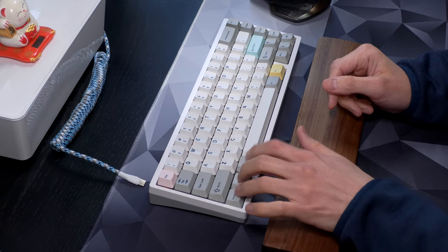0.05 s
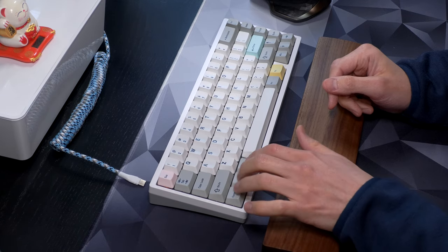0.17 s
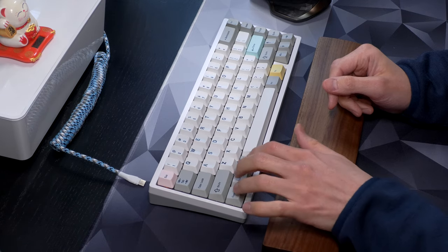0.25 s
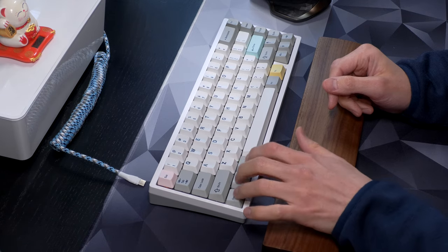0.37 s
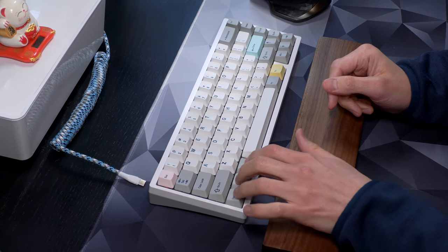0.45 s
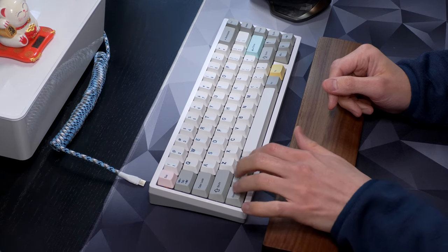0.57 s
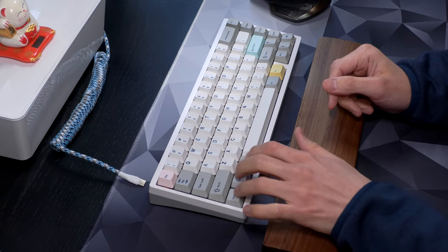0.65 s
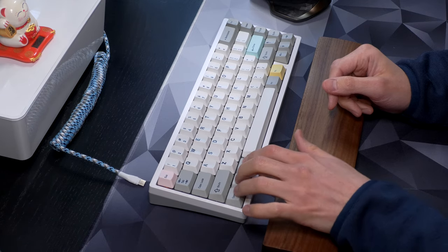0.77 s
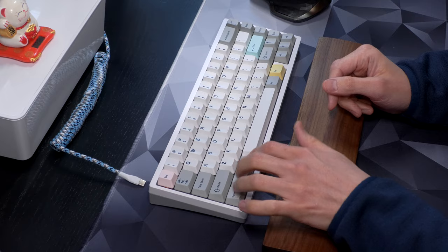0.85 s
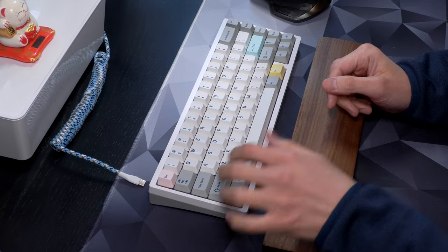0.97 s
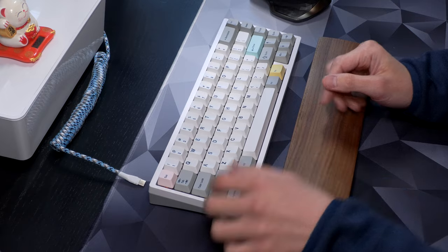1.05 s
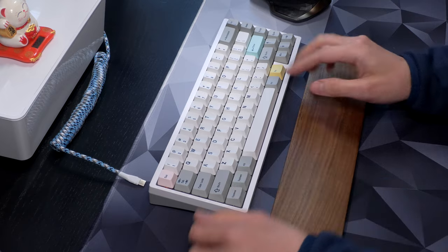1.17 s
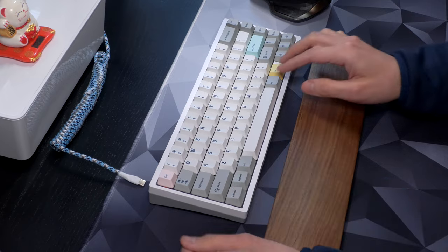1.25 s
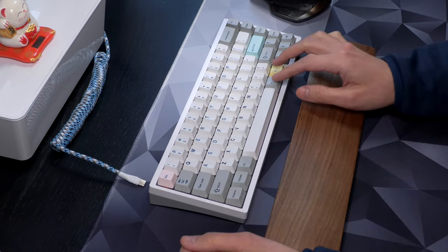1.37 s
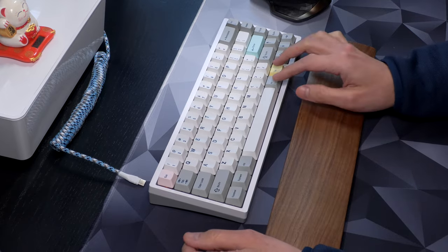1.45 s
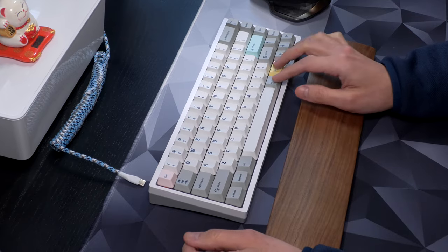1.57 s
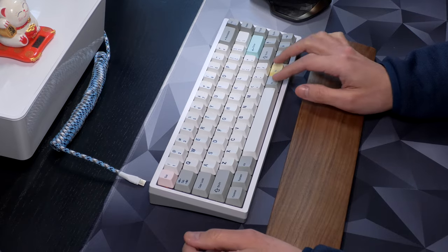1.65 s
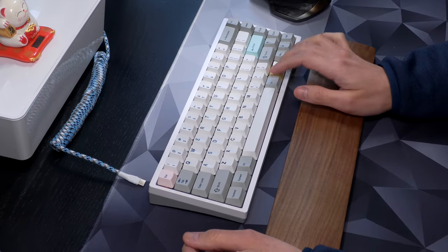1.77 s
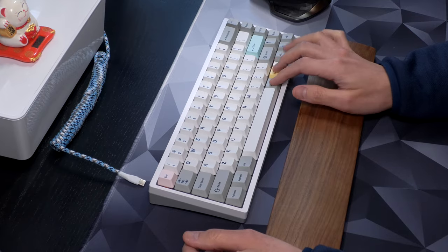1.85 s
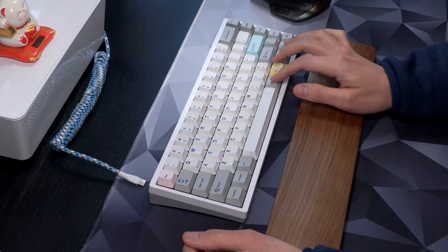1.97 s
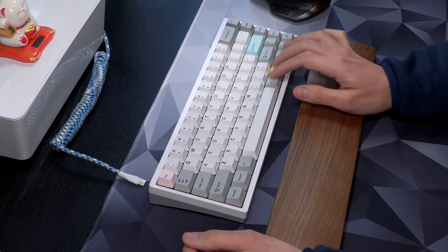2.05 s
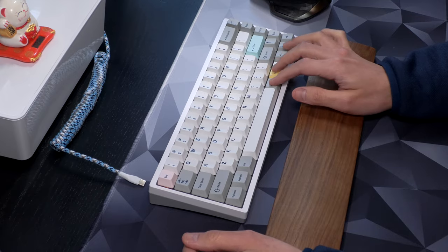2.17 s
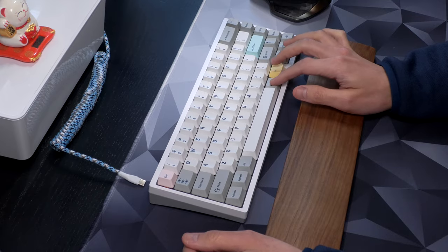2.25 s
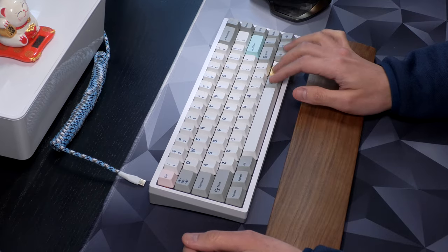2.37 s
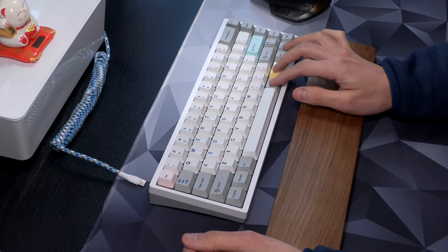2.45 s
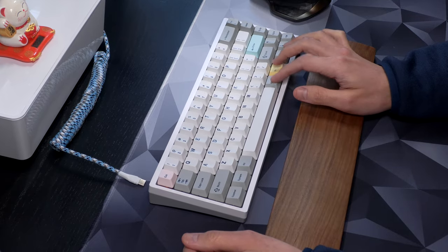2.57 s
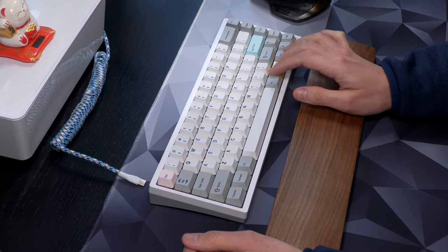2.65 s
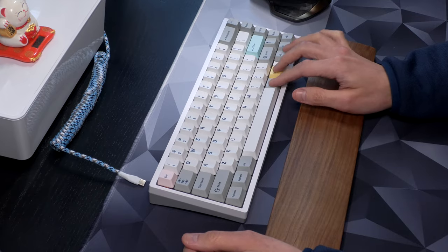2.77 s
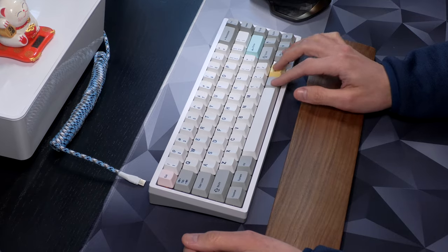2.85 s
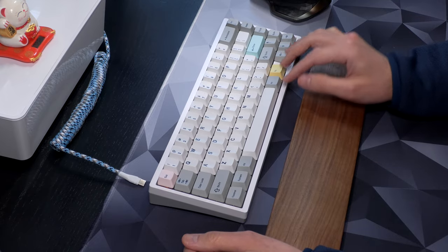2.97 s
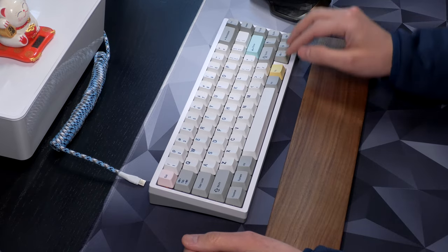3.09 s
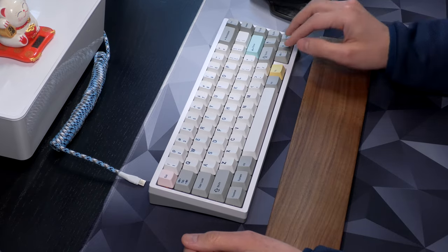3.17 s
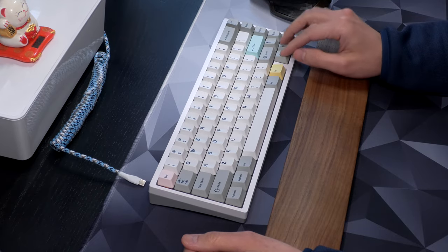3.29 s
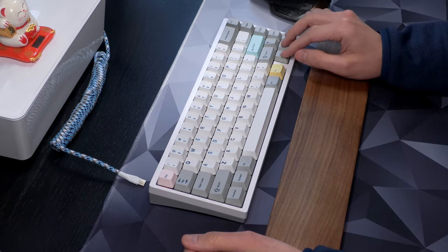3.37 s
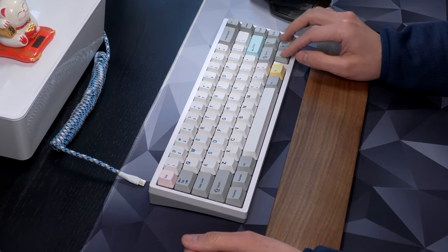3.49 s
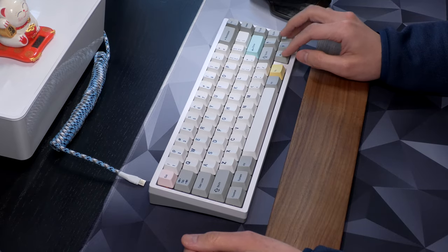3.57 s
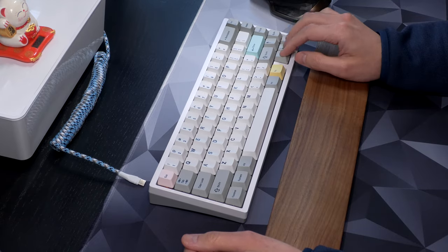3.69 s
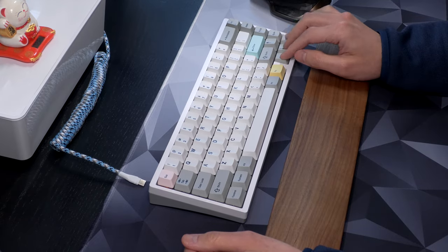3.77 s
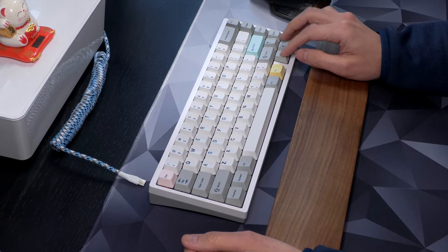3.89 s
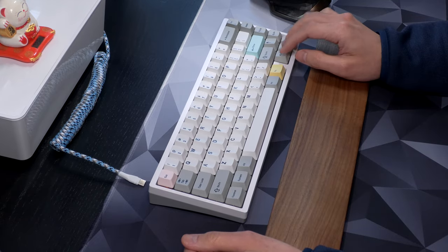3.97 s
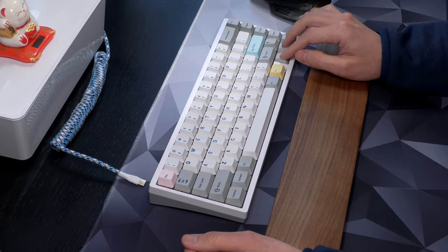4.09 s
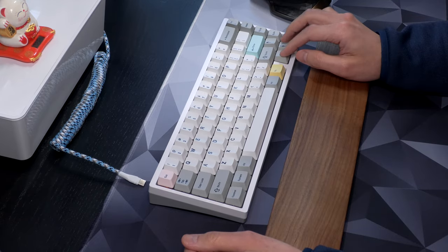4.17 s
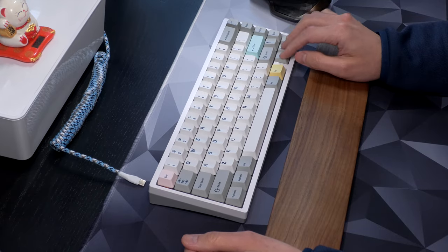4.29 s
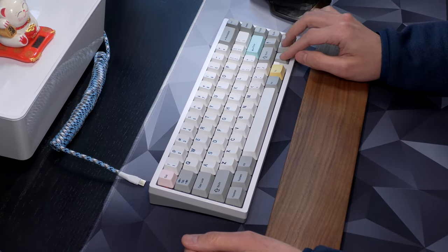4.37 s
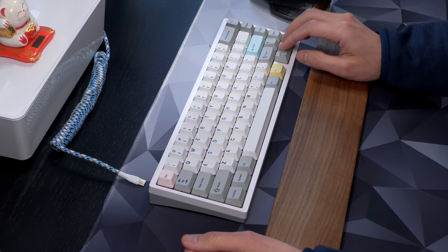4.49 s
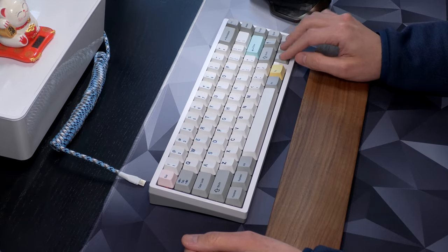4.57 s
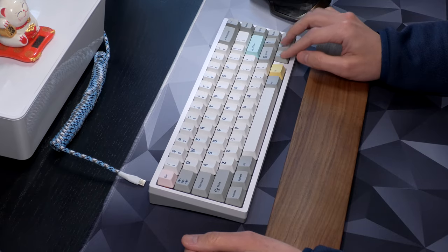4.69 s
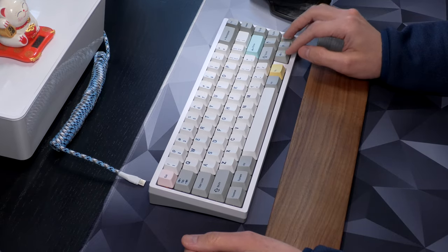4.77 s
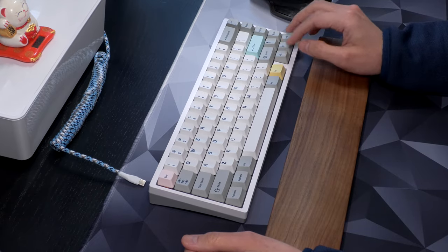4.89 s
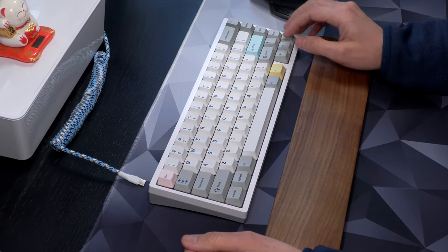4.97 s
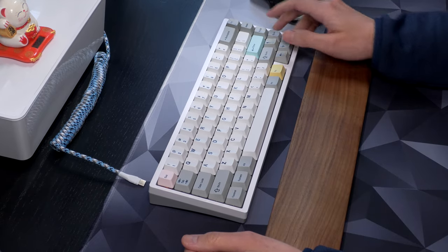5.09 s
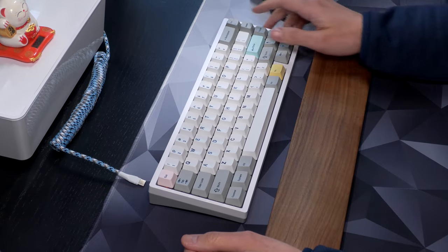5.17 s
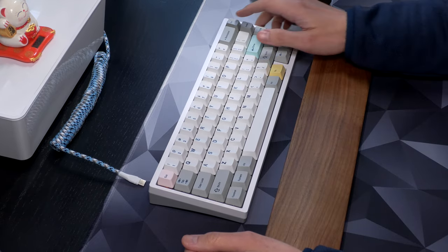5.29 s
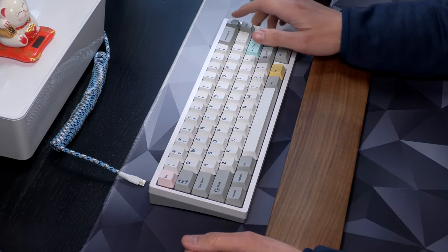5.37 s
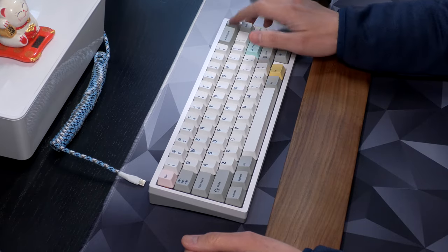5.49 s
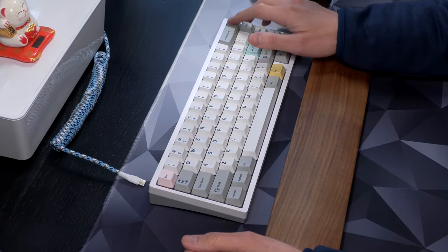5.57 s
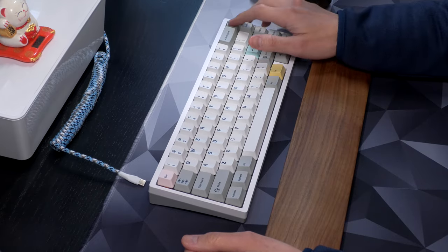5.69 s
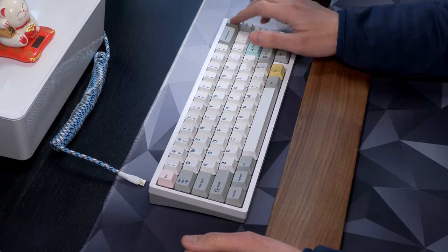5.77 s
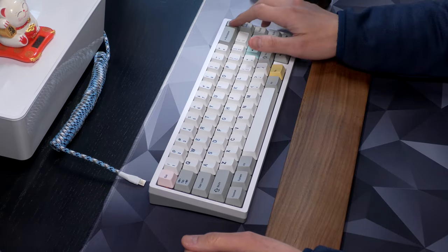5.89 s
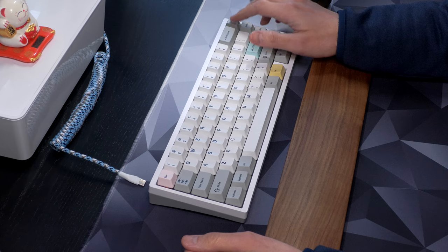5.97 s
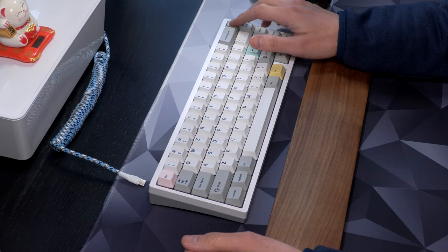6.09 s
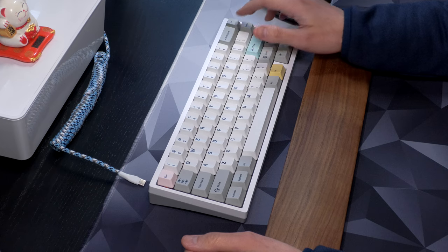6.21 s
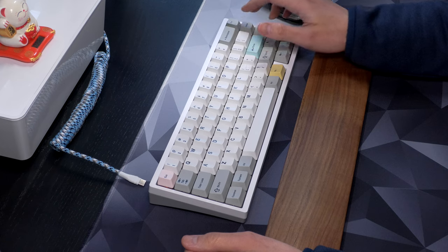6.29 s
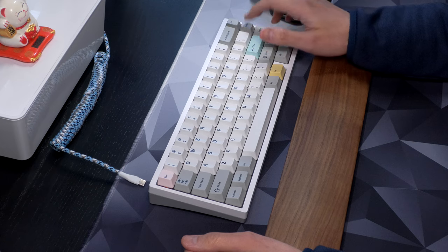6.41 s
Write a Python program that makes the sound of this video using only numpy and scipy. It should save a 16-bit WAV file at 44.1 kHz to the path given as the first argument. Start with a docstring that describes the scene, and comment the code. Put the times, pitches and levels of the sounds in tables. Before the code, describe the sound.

Close up in a quiet, dry room, fingers roll over a few mechanical keyboard keys, making bright clacks with slight low desk thumps underneath. A hand lands softly on the desk, then keys clack more firmly in pairs. After a pause comes a lighter run in groups of three, and finally four evenly spaced single presses. Faint hiss and low rumble fill the gaps.

```python
"""A quiet room, close to a mechanical keyboard: keys are tapped in four quick runs.
Every down- or upstroke is one short knock that rings keycap, plate, switch housing and spring.
Each key has its own voice; the other keys and the room scatter it. The desk thumps and sways
under the hands, and once a hand is set down on it. Faint rumble and hiss lie underneath."""
import sys
import numpy as np
from scipy import signal
from scipy.fft import rfft, irfft
from scipy.io import wavfile

SR = 44100
rng = np.random.default_rng(int(sys.argv[2]) if len(sys.argv) > 2 else 0)


def waveform_to_disk(signal):
    """Save audio, clipped to [-1, 1], as 16-bit WAV at the path in sys.argv[1]."""
    frames = np.transpose(np.atleast_2d(signal))
    scaled = np.clip(frames, -1, 1) * 32767
    samples = np.round(scaled).astype(np.int16)
    wavfile.write(sys.argv[1], SR, samples)


N = 284004
TIME = np.arange(N) / SR
FIRM_DB = -28  # keycap level of a firm stroke

# key: (plate f/Hz, downstroke, upstroke) at FIRM_DB; each stroke:
# (keycap f/Hz, keycap ring length/x, plate level/dB, housing level/dB, spring level/dB), re keycap
KEY_VOICES = {"left1": (1130, (2620, 1.1, -11, -3.5, -18.5), (2760, 1, -2, -2, -9)),
              "left2": (1090, (2470, 1.1, -12, -8.5, -18.5), (2450, 1, -7.5, -11, -25)),
              "left3": (1110, (2770, 1.25, -15, -8, -28.5), (2100, .8, -6.5, 0, -16)),
              "wide1": (1090, (2500, .95, -15, -7, -18), (2320, .85, -12.5, -5.5, -19.5)),
              "wide2": (1100, (2650, .9, -12, -9, -21), (2660, 1, -5.5, -9.5, -19)),
              "arrow1": (1070, (2880, .7, -10.5, -4, -12), (2450, .8, -11, -5, -21.5)),
              "arrow2": (1060, (2670, 1.15, -13.5, -6.5, -21), (2550, .9, -11.5, -11, -24.5)),
              "arrow3": (1030, (2520, 1.2, -17.5, -12, -21), (2400, .9, -8, -13, -17)),
              "corner1": (1120, (2460, 1, -9.5, -5, -23.5), (2380, 1.2, -13, -19, -35)),
              "corner2": (1120, (2320, 1.1, -14.5, -11.5, -24), (2340, 1.6, -8.5, -26, -32)),
              "corner3": (1120, (2770, .9, -11, -4.5, -22), (2380, 1.7, -10.5, -30, -33))}
# key, down t/s, down level/dB, up t/s, up level/dB
KEY_PRESSES = [("left1", .1005, -27, .2124, -33.5), ("left2", .1333, -24.5, .264, -36.5),
               ("left3", .183, -24, .3268, -38.5), ("left1", .4258, -27.5, .5543, -36),
               ("left2", .4692, -22, .5927, -32), ("left3", .5222, -25.5, .6727, -41),
               ("left1", .7317, -25.5, .8668, -40.5), ("left2", .7746, -23.5, .8961, -38.5),
               ("left3", .802, -19, .9286, -31), ("wide1", 1.8326, -19.5, 1.9694, -39),
               ("wide2", 1.8828, -17, 2.0356, -33.5), ("wide1", 2.1504, -19.5, 2.2691, -26.5),
               ("wide2", 2.2154, -20, 2.356, -31), ("wide1", 2.414, -25, 2.5405, -32),
               ("wide2", 2.4745, -23, 2.6225, -35), ("wide1", 2.7325, -20, 2.8928, -40.5),
               ("wide2", 2.7887, -19, 2.9456, -37.5), ("arrow1", 3.6738, -28, 3.8837, -39.5),
               ("arrow2", 3.7498, -23, 3.864, -39.5), ("arrow3", 3.811, -36.5, 3.954, -39),
               ("arrow1", 3.9788, -30, 4.1385, -40.5), ("arrow2", 4.0486, -24, 4.1724, -40),
               ("arrow3", 4.0984, -30, 4.2315, -34.5), ("arrow1", 4.2663, -30, 4.4175, -41.5),
               ("arrow2", 4.3217, -25.5, 4.4403, -38.5), ("arrow3", 4.373, -32.5, 4.4971, -32.5),
               ("arrow1", 4.5424, -30.5, 4.6938, -44), ("arrow2", 4.5975, -28, 4.7128, -38),
               ("arrow3", 4.6419, -29, 4.7609, -43), ("corner1", 5.5684, -23.5, 5.6515, -26),
               ("corner1", 5.7516, -22, 5.8354, -29.5), ("corner2", 5.946, -21.5, 6.0207, -26),
               ("corner3", 6.1222, -20.5, 6.2119, -30.5)]
# a held key's spring slips, or a key bounces back: t/s, keycap level/dB, spring level/dB re keycap
EXTRA_KNOCKS = [(.1496, -47, 13), (4.0558, -38, -1), (4.6052, -39, -13)]
# plate f/Hz, keycap f/Hz, plate level/dB re keycap, housing level/dB re spring
EXTRA_KNOCK_VOICE = (1090, 2800, -6, -1)
def knocks(pitch_rise_per_db=.006, plate_fall_per_db=.3, treble_rise_per_db=.2):
    """One row per stroke or extra knock; a harder stroke is higher and brighter, with less plate."""
    rows = []
    for key, down_s, down_db, up_s, up_db in KEY_PRESSES:
        plate_hz, down, up = KEY_VOICES[key]
        for start_s, db, voice in ((down_s, down_db, down), (up_s, up_db, up)):
            cap_hz, cap_length, plate_db, housing_db, spring_db = voice
            over_db = db - FIRM_DB
            cap_hz *= 1 + pitch_rise_per_db * over_db
            plate_db += db - plate_fall_per_db * over_db
            treble_db = db + treble_rise_per_db * over_db
            rows.append((start_s, db, cap_hz, cap_length, plate_hz,
                         plate_db, treble_db + housing_db, treble_db + spring_db))
    plate_hz, cap_hz, plate_db, housing_db = EXTRA_KNOCK_VOICE
    for start_s, db, spring_db in EXTRA_KNOCKS:
        rows.append((start_s, db, cap_hz, 1, plate_hz,
                     db + plate_db, db + spring_db + housing_db, db + spring_db))
    return rows


# each run on another part of the board: start t/s, rim echo delay/ms, plate ring length/x, spring f/Hz,
# spring linger level/dB, second contact level/dB, rattle level/dB, desk thump level/dB
RUNS = [(0, 1.5, 0.96, 7120, -12.5, -32, -14.5, 1), (1.5, 1.6, 0.98, 7490, -30, -31, -16, -2),
        (3.3, 1.54, 0.95, 8230, -18, -10, -14.5, 1), (5.2, 1.38, 0.66, 7640, -25, -17, -15.5, 3.5)]
# modes: f/part pitch, level/dB, swell/ms (keycap and plate: at ring length 1)
KEYCAP_MODES = [(.92, -5, 0.45), (1.05, -1.5, 0.44), (1.3, -9.5, 0.59)]
HOUSING_MODES = [(1, -2.5, .26), (1.37, -11, 0.42)]
PLATE_MODES = [(.985, -1.5, 1.3), (1.25, -3.5, 1.79), (1.64, -7, 1.2), (.84, -22.5, 5.7)]
SPRING_MODES = [(.97, 3.95, 0.31), (1, 0.44, 0.07)]
def keystrokes(housing_hz=3967, plate_band_hz=(680, 4000), rim_db=-14, linger_swell_ms=2.0):
    """Each knock rings four parts at once; a tilted cap touches a second time just after."""
    out, t = np.zeros(N), TIME[:SR // 10]
    for start_s, cap_db, cap_hz, cap_length, plate_hz, plate_db, housing_db, spring_db in knocks():
        _, rim_ms, plate_length, spring_hz, linger_db, second_db, rattle_db, _ = run_at(start_s)
        cap = undb(cap_db) * ring(KEYCAP_MODES, cap_hz, t, cap_length) / np.sqrt(cap_length)
        click = cap + undb(housing_db) * ring(HOUSING_MODES, housing_hz, t)
        second = np.interp(t - rng.uniform(0.000682, 0.001307), t, click, left=0)
        click = unit(click + undb(second_db) * second) * np.std(click)  # contacts share the energy
        plate = ring(PLATE_MODES, plate_hz * detune(0.025), t, plate_length)
        rim_echo = np.interp(t - rim_ms / 1000, t, plate, left=0)
        plate = unit(plate - undb(rim_db) * rim_echo) * np.std(plate)  # the rim inverts the wave
        plate = band(plate, *plate_band_hz)  # a small plate radiates little bass
        spring = ring(SPRING_MODES + [(1, linger_db, linger_swell_ms)], spring_hz * detune(0.0052), t)
        knock = click + undb(plate_db) * plate + undb(spring_db) * spring
        add(out, start_s, scatter(knock, rattle_db))
    return out


def run_at(time_s):
    """The row of the run in which a moment falls."""
    return RUNS[sum(time_s > run[0] for run in RUNS[1:])]


def scatter(knock, rattle_db, t60_s=0.021):
    """Neighbouring keys and the case rattle along, differently for each knock."""
    rattle = signal.fftconvolve(knock, echoes(t60_s, 280, 19000, delay_s=0.00072))
    return knock + undb(rattle_db) * rattle[:len(knock)]


# t/s, level/dB before rattle
FINGER_TOUCHES = [(.027, -52), (1.287, -53.5), (1.39, -53), (1.865, -45), (1.9082, -60), (2.128, -52),
                  (2.7634, -42), (4.02, -54), (4.58, -53), (5.5528, -41.5), (6.1, -49)]
def touches(tick_hz=2156, swell_ms=0.085):
    """Fingertips brush keys and case with faint, loose ticks."""
    out = np.zeros(N)
    for start_s, db in FINGER_TOUCHES:
        tick = ring([(1, db, swell_ms)], tick_hz, TIME[:SR // 10])
        add(out, start_s, scatter(tick, rattle_db=7, t60_s=0.042))
    return out


# f/Hz, level/dB at unit push, swell/ms
DESK_MODES = [(39, -59.5, 45), (108.8, -69, 23.4), (170.6, -67.5, 13), (340, -63, 0.95), (545, -56, 1.2)]
# t/s, level/dB, f/Hz before thud_tuning, swell/ms
HAND_THUDS = [(1.2691, -44.5, 1080, 0.2), (1.27, -48.5, 213, 2.7), (1.291, -42.5, 117.2, 22),
              (1.373, -45.5, 115, 17.7)]
def desk_thumps(reference_db=-26, follow=0.55, thud_tuning=0.89):
    """Key knocks and the landing heel of a hand ring the desk; finger weight varies less than the click."""
    out, t = np.zeros(N), TIME[:SR // 2]
    for start_s, cap_db, *_ in knocks():
        thump_db = run_at(start_s)[-1]
        push = undb(follow * (cap_db - reference_db) + thump_db)
        add(out, start_s, push * ring(DESK_MODES, detune(0.024), t))
    for start_s, db, hz, swell_ms in HAND_THUDS:
        add(out, start_s, ring([(thud_tuning, db, swell_ms)], hz, t))
    return out


# a hand shifts its weight: t/s, level/dB
HAND_LEANS = [(0, -54), (.17, -46), (.51, -50), (1.27, -45), (1.94, -51), (2.8, -48), (3.39, -60),
              (4.12, -53), (4.65, -45.5), (4.85, -59), (6.25, -59)]
def desk_sway(centre_hz=60.3, wander_hz=1.8, swell_s=.062, key_db=-56, rest_db=-67, follow=.45):
    """Keys and leaning hands push the desk's main resonance; the swings build, add in power and die."""
    power = np.full(N, undb(rest_db) ** 2)
    swing = swell(TIME[:SR] / swell_s)
    key_pushes = [(start_s, key_db + follow * (db - FIRM_DB)) for start_s, db, *_ in knocks()]
    for start_s, db in key_pushes + HAND_LEANS:
        add(power, start_s, (undb(db) * swing) ** 2)
    wander = np.interp(TIME, np.linspace(0, TIME[-1], 30), rng.standard_normal(30))
    hz = centre_hz + wander_hz * wander
    return np.sqrt(power) * np.sin(2 * np.pi * np.cumsum(hz) / SR)


def room(keys, early_db=-17.4, late_db=-23, beam_hz=2600, beam_share=0.38):
    """Things on the desk answer first, then the small, dry room."""
    # the keycap's note beams upwards, so less of it spreads sideways
    sideways = keys - beam_share * signal.lfilter(*signal.iirpeak(beam_hz, 2, fs=SR), keys)
    early = undb(early_db) * echoes(0.12, 500, 6900, delay_s=0.0077)
    late = undb(late_db) * echoes(0.39, 410, 5300, delay_s=0.025)
    return keys + signal.fftconvolve(sideways, early + late)[:N]


# f/Hz, relative density level/dB
FLOOR_SPECTRUM = [(15, -45), (45, -50), (100, -60.5), (200, -67.5), (400, -70), (1500, -73.5), (16000, -75)]
def noise_floor(rms_db=-61):
    """Steady room rumble under even microphone hiss."""
    hz, db = np.transpose(FLOOR_SPECTRUM)
    bin_hz = np.maximum(np.fft.rfftfreq(N, 1 / SR), 1)
    colour = undb(np.interp(np.log(bin_hz), np.log(hz), db))
    return undb(rms_db) * unit(irfft(rfft(rng.standard_normal(N)) * colour, N))


def ring(modes, hz, t, length=1):
    """Damped modes that swell and fade; length stretches their envelopes."""
    out = 0
    for ratio, db, swell_ms in modes:
        envelope = swell(t * 1000 / (swell_ms * length))
        out = out + undb(db) * envelope * np.sin(2 * np.pi * hz * ratio * t)
    return out


def swell(age):
    """Rise to 1 at age 1, then decay."""
    return age * np.exp(1 - age)


def detune(spread):
    """Random pitch factor around 1."""
    return 1 + spread * rng.standard_normal()


def echoes(t60_s, low_hz, high_hz, delay_s):
    """Dense fading reflections, in-band power gain near 1."""
    t = TIME[:SR // 2]
    tail = rng.standard_normal(len(t)) * np.exp(-np.log(1000) * t / t60_s) * (t > delay_s)
    return band(tail / np.linalg.norm(tail), low_hz, high_hz)


def band(x, low_hz, high_hz):
    """Gentle band-pass."""
    return signal.sosfilt(signal.butter(2, [low_hz, high_hz], "bandpass", fs=SR, output="sos"), x)


def undb(db):
    """Decibels to gain."""
    return 10 ** (np.asarray(db) / 20)


def unit(x):
    """Scale to rms 1."""
    return x / np.sqrt(np.mean(x ** 2))


def add(out, start_s, sound):
    """Mix a sound in."""
    i = round(start_s * SR)
    out[i:i + len(sound)] += sound[:max(N - i, 0)]


def scene():
    """Keys in the room, over desk and noise floor; mono."""
    return (room(keystrokes() + touches()) + desk_thumps() + desk_sway() + noise_floor())[None]


def record(dry):
    """Steep low-pass at 15.9 kHz."""
    return signal.sosfilt(signal.ellip(10, .1, 70, 15900, fs=SR, output="sos"), dry)


dry = scene()
out = record(dry)
waveform_to_disk(out)
```